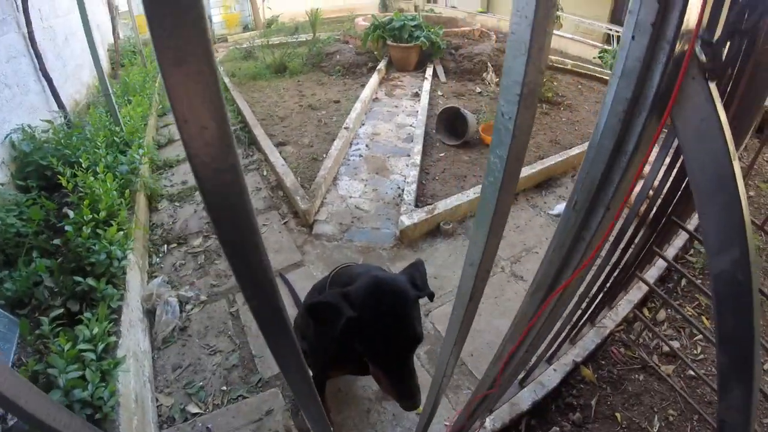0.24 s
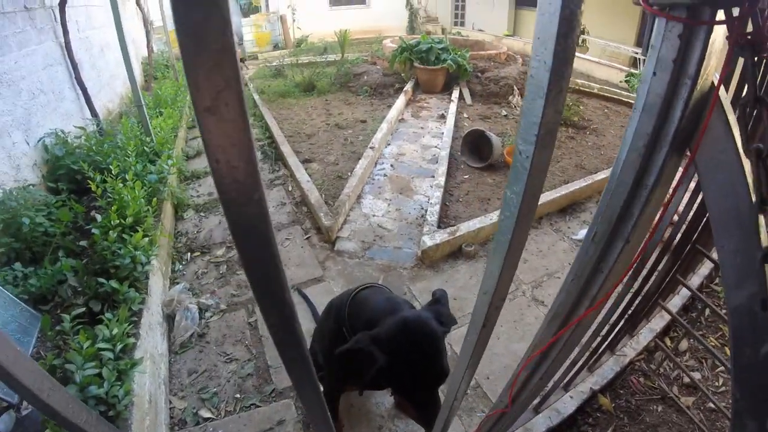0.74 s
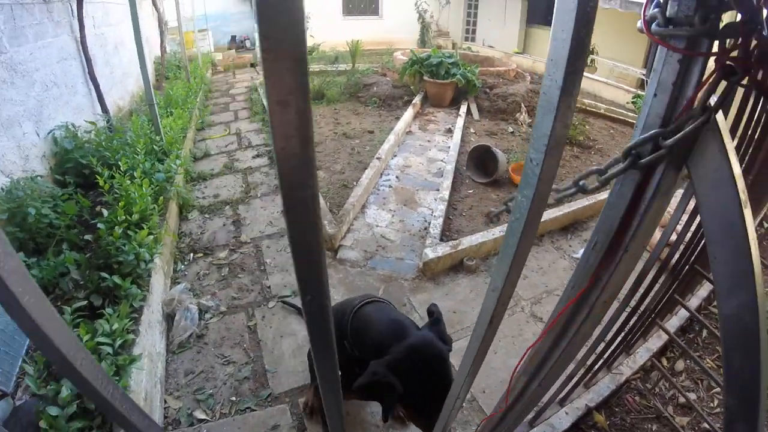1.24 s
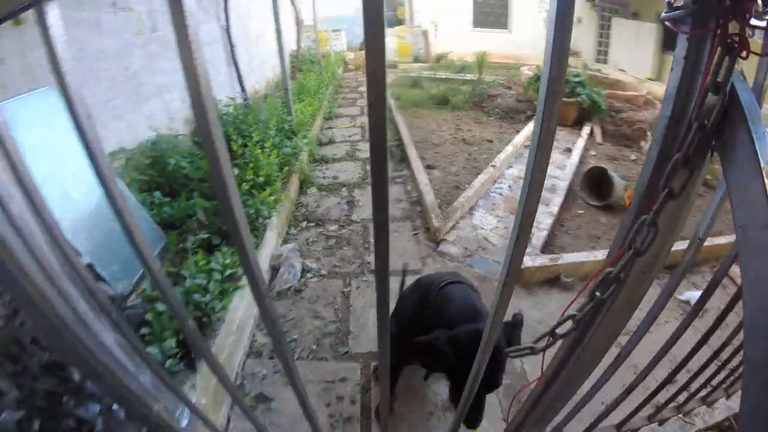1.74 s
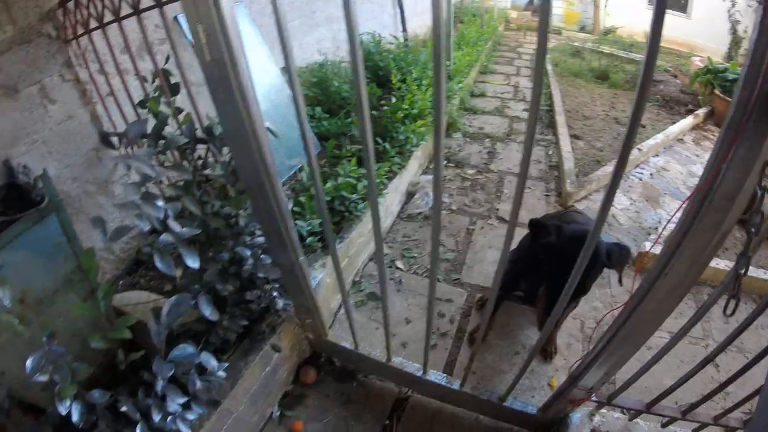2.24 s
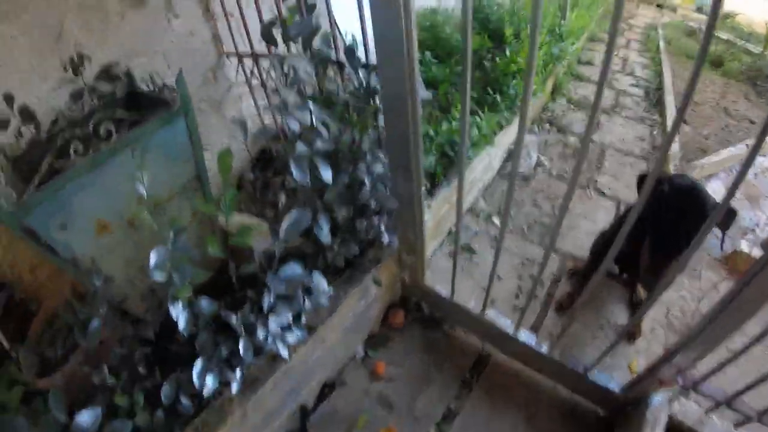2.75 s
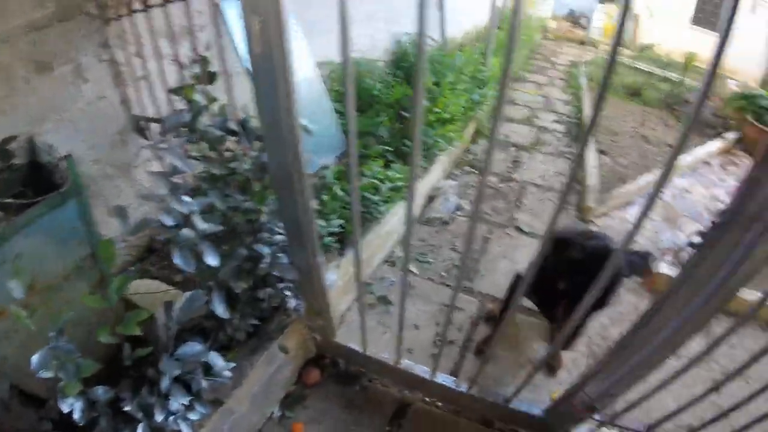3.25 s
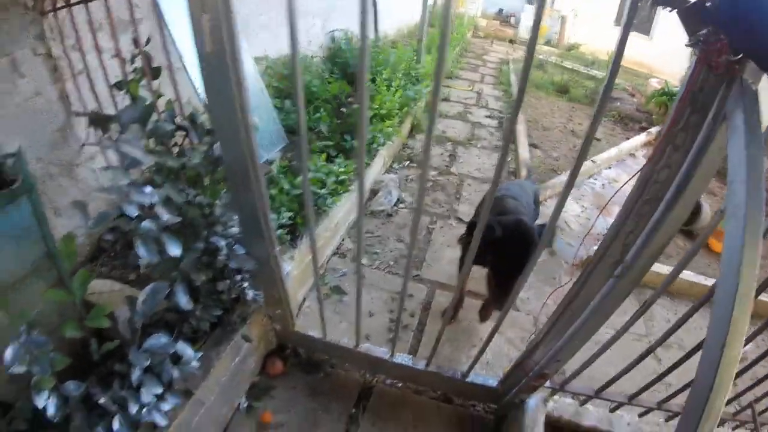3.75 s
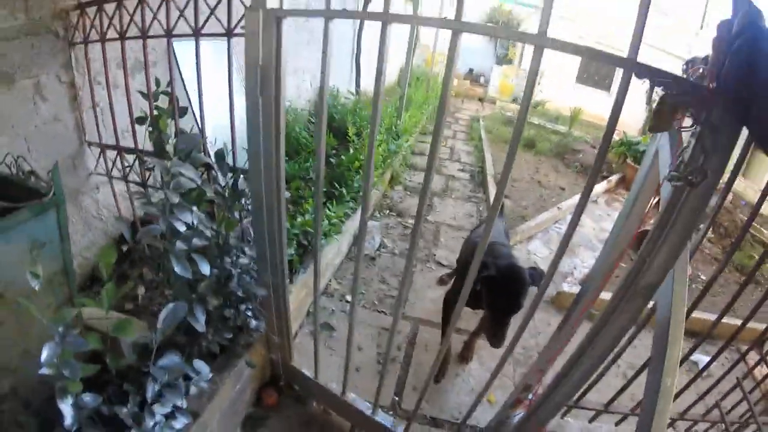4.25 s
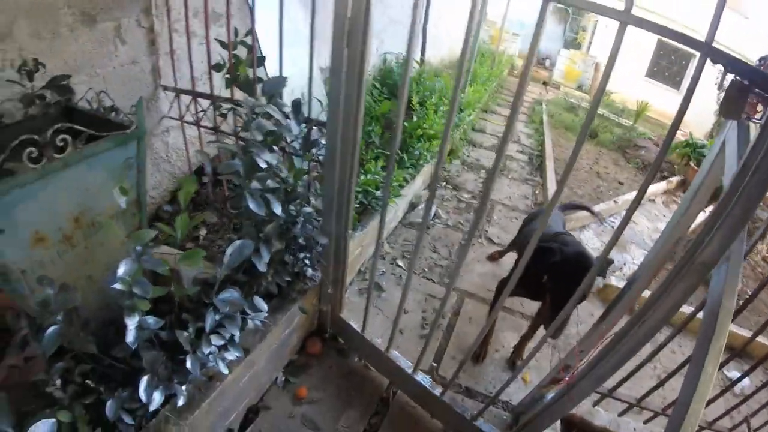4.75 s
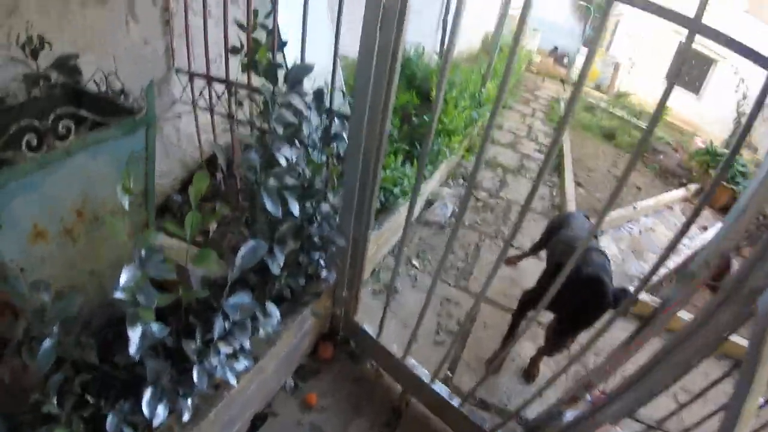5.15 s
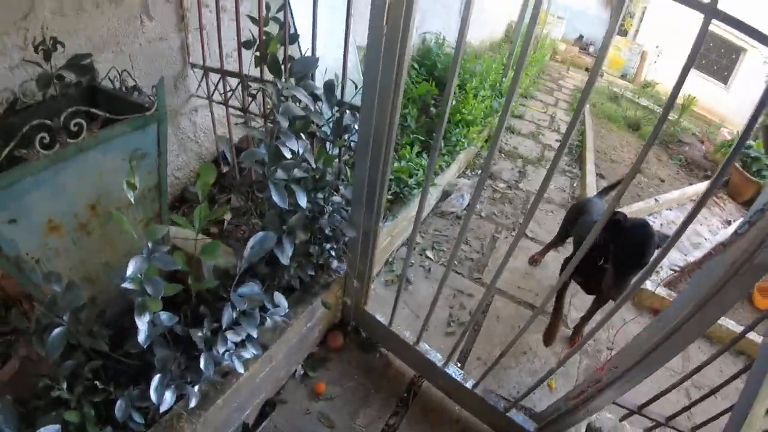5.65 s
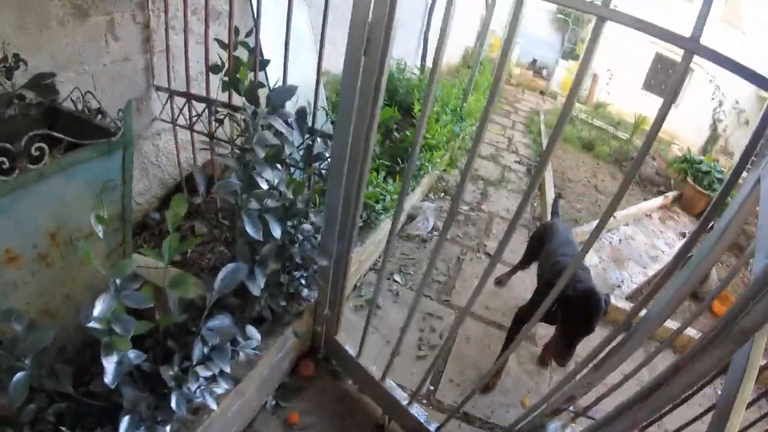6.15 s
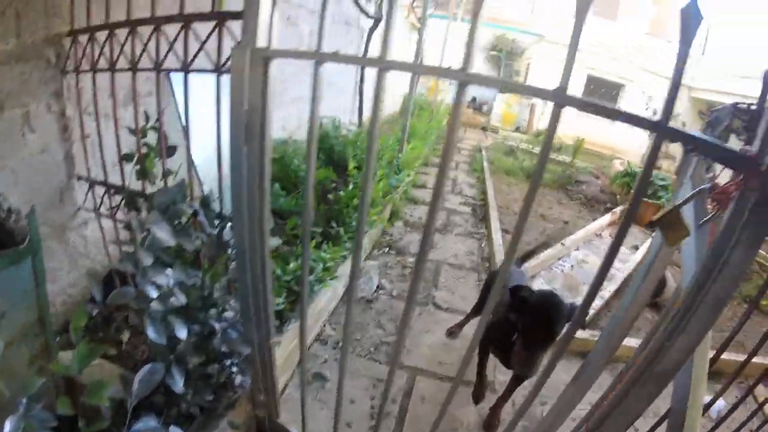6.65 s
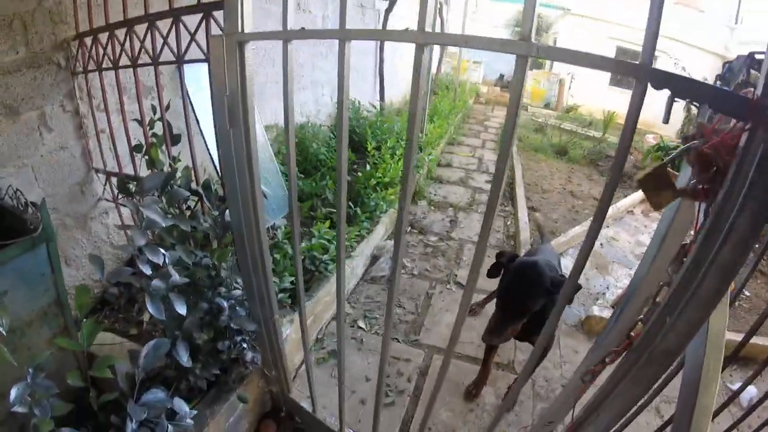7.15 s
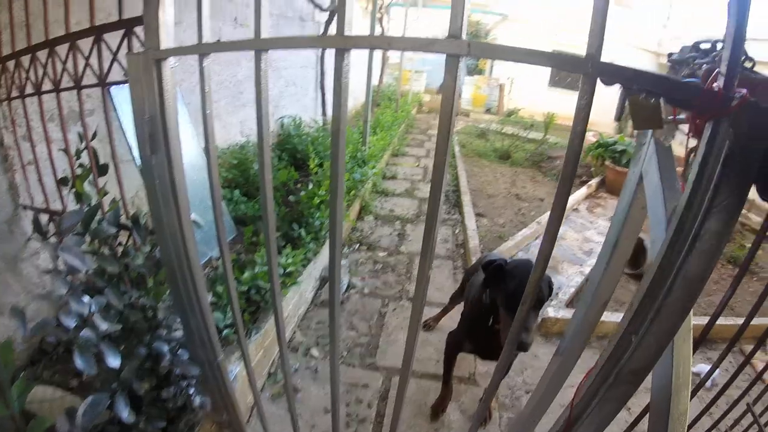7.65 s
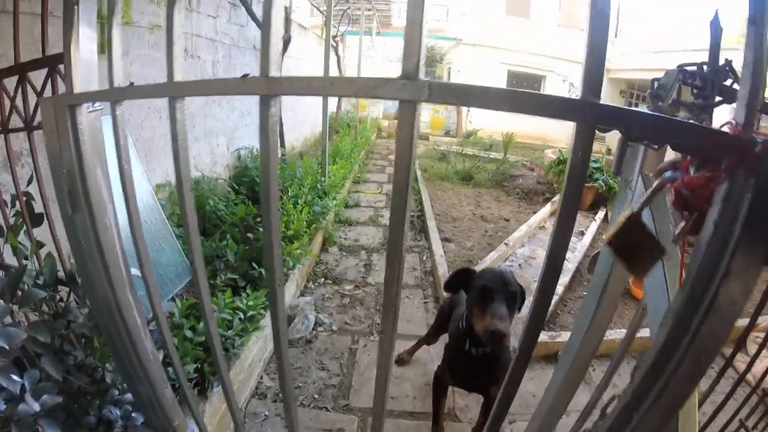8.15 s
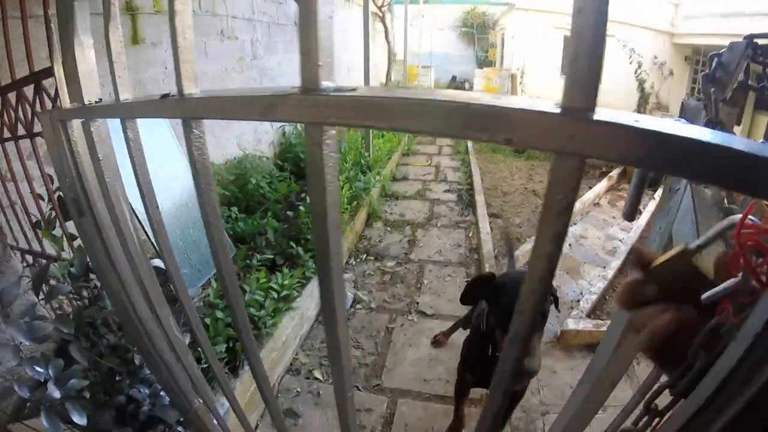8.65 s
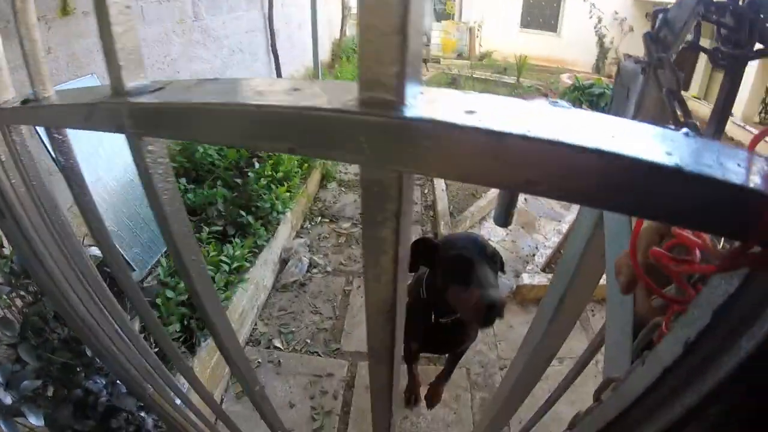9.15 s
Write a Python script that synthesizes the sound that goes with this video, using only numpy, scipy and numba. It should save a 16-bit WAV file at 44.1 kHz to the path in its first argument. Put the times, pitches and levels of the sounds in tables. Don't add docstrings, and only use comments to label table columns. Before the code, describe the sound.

Thin, boxed-in outdoor sound with little bass from outside: irregular metallic knocks on a barred gate, one loud clank early, then sparse taps, a plasticky thump at the microphone and paw scuffs. A dense burst of chain clatter follows with low humming, then bolt knocks, bright tinkling links, a ringing double blow and scattered light lock clicks over constant hiss and deep handling rumble.

```python
import sys
import numpy as np
from scipy import signal
from scipy.fft import rfft, irfft, next_fast_len
from scipy.io import wavfile
from numba import njit

SR = 44100
rng = np.random.default_rng(int(sys.argv[2]) if len(sys.argv) > 2 else 0)


def linear_from_db(decibels):
    return 10 ** (np.asarray(decibels, float) / 20)


def to_wav(sig):
    pcm = np.clip(np.atleast_2d(sig), -1, 1) * 32767
    pcm = np.round(pcm).astype(np.int16)
    wavfile.write(sys.argv[1], SR, pcm.T)


N = 414523
T = np.arange(N) / SR
PORT_HZ, TOP_HZ = 1250, 15200


def unit(x):
    return x / np.sqrt(np.mean(x ** 2))


def shape(table, hz):
    f, v = np.transpose(table)
    return np.interp(np.log(hz), np.log(f), v)


def coloured(x, table):
    size = next_fast_len(N)
    hz = np.maximum(np.arange(size // 2 + 1) * SR / size, 1)
    spectrum = rfft(x, size) * linear_from_db(shape(table, hz))
    return unit(irfft(spectrum, size)[:N])


def band(lo_hz, hi_hz):
    sos = signal.butter(2, [lo_hz, hi_hz], "band", fs=SR, output="sos")
    return unit(signal.sosfilt(sos, rng.standard_normal(N)))


def conv(x, response):
    return signal.oaconvolve(x, response)[:N]


def bursts(rows, attack_s, release_s, extra_db=0.):
    fade_db = 30
    total = np.zeros(N)
    for (s, hold, db), extra in zip(np.array(rows)[:, :3], extra_db + np.zeros(len(rows))):
        edges = np.cumsum([s - attack_s, attack_s, hold, release_s])
        span = slice(max(int(edges[0] * SR), 0), int(edges[-1] * SR))
        fade = np.interp(T[span], edges, [-fade_db, 0, 0, -fade_db])
        total[span] += linear_from_db(db + extra + fade)
    return total


def clicks(rate, scatter_db):
    happens, sign, strength = rng.random((3, N))
    level = linear_from_db(-scatter_db * np.log(strength + 0.025))
    return unit((happens < rate / SR) * np.sign(sign - .5) * level)


def blows(times, dbs, contact_ms, first=0.):
    out, t = np.zeros(N + 2048), np.arange(2048) / SR
    for s, db, ms, chatter in zip(times, dbs, contact_ms, rng.standard_normal((len(times), 2048))):
        u = 1000 * t / np.clip(ms, .1, 12)
        burst = chatter * np.sqrt(u + 0.0068) * np.exp(-u)
        burst = burst / np.sqrt(np.sum(burst ** 2)) + first * (t == 0)
        start = int(s * SR)
        out[start:start + 2048] += linear_from_db(db) * burst
    return out[:N]


@njit
def decay(hz, gain, t60, phase, size):
    out = np.zeros(size)
    for k in range(len(hz)):
        z = gain[k] * np.exp(1j * phase[k])
        p = np.exp((2j * np.pi * hz[k] - np.log(1000) / t60[k]) / SR)
        for i in range(min(size, int(1.2 * t60[k] * SR))):
            out[i] += z.imag
            z *= p
    return out


def ring(modes, seconds, scatter=0.):
    hz, db, t60 = np.transpose(modes) * 1.
    phase = scatter * 2 * np.pi * rng.random(len(hz))
    return decay(hz, linear_from_db(db), np.clip(t60, .005, 2.5), phase, int(seconds * SR))


def twins(modes, spread):
    hz, db, t60 = np.transpose(modes)
    off = 1 + spread * rng.standard_normal((2, len(hz)))
    return np.vstack([modes] + [np.transpose([hz * o, db - 6, .7 * t60]) for o in off])


def hiss():
    # pitch_hz, level_db (per Hz)
    hiss_curve = [(88, -7), (150, -3.5), (234, -2), (268, -2.5), (812, -7.5), (1290, -10), (1540, -8.5),
                  (1660, -11), (3980, -17), (13500, -32.5), (15200, -41)]
    return linear_from_db(-59) * coloured(rng.standard_normal(N), [(60, -44.0)] + hiss_curve)


def handling():
    # start_s, hold_s, level_db
    shifts = [
        (.1, 0.58, -62),
        (2.65, 0.85, -48),
        (4.13, 0.029, -33.5),
        (5.0, 0.37, -47),
        (6.0, 0.062, -39.5),
        (6.45, 0.31, -53),
        (7.25, 0.22, -77),
        (8.9, 0.027, -44),
    ]
    deep = (linear_from_db(-54) + bursts(shifts, attack_s=0.083, release_s=0.47)) * band(1.8, 15.8)
    return deep + linear_from_db(-59.5) * band(17.0, 59.0) + linear_from_db(-65.5) * band(55, 176)


def parts():
    # pitch_hz, level_db, t60_s (time to fall 60 dB)
    latch = [(1432, -8, .35), (1545, -14, .7), (2481, -15, 1.2), (2505, -15, 1.1), (2627, -19, .7),
             (2745, -8, .38), (2842, -9, .45), (2955, -7, .42), (3300, -8, .15), (3499, -19, .5),
             (3725, -10, .23), (4576, -8, .1), (5943, -6, .13), (6115, -13, .2)]
    rail = [(1615, -11, 0.45), (1570, -15, .4), (2885, -3, 0.4), (3192, -17, 0.43), (3542, 0, 0.18),
            (4145, -7, 0.14), (4700, -14, 0.15), (5884, -8, 0.21), (6438, -22, 0.3), (7090, -18, 0.23)]
    post = [(1610, -8, .27), (2584, -11, .32), (2789, -12, .28), (3332, -14, .45), (3505, -4, .66),
            (3530, -7, .6), (3591, 0, .36), (3924, -17, .4), (4436, -15, .24), (4721, -17, .33),
            (5916, -19, .33), (6465, -14, .25), (7106, -17, .55), (8441, -17, .35)]
    held_post = [(3321, -14, .4), (3494, -6, .28), (3591, 0, .26), (3693, -7, .3)]
    bolt = [(2509, -13, .6), (2778, -10, .41), (3289, -17, .55), (3801, -3, .2), (4474, -11, .22),
            (4942, -11, .28), (5033, -3, .25), (5319, -14, .22), (6471, -9, .24), (6982, -6, .12),
            (8436, -8, .12)]
    bar = [(2487, -11, .85), (2562, -4, .43), (2745, -8, .5), (2950, -9, .31), (3801, -4, .2),
           (4016, -6, .21), (4360, -6, .17), (4953, -11, .26), (5039, -9, .32), (5862, -2, .19),
           (6142, -11, .22), (1432, -14, .6)]
    lock = [(1437, -4, .08), (3558, -9, .34), (3630, -10, .28), (3709, 0, .24), (3838, -7, .14),
            (4086, -21, .27), (6158, -13, .12), (6778, -16, .13), (7084, -24, .5), (7634, -18, .14)]
    loop = [(2186, -9, .3), (2482, -13, .5), (2864, -10, .4), (3332, -6, .3), (3488, -10, .3),
            (5319, -13, .1), (6401, -13, .11), (7084, -7, .25), (8565, -10, .1)]
    hasp = [(1432, 0, .14), (1599, -16, .3), (2169, -12, .45), (2363, -14, .24), (2789, -16, .31),
            (2875, -11, .26), (2918, -11, .38), (3246, -18, .3), (2600, -16, .25), (3537, -12, .3),
            (3623, -16, .35)]
    brace = [(1610, -16, .35), (3505, -2, .7), (3591, 0, .5), (3660, -8, .3), (7106, -16, .3)]
    shackle = [(1448, -4, .19), (2191, -16, .5), (2568, -12, .45), (3370, 1, .14), (3537, -16, .4),
               (3704, -16, .3), (5922, -14, .15), (7079, -3, .08)]
    hook = [(2169, -17, .7), (2363, -8, .29), (2568, -17, .6), (2869, -2, .14), (3332, -3, .29),
            (3472, -8, .55), (3908, -6, .2), (7084, -22, .5)]
    keeper = [(2169, -14, .7), (2401, -4, .42), (2632, -6, .32), (2799, -7, .35), (3537, -3, .65),
              (5211, -5, .17), (6444, -8, .23), (6638, -1, .12), (7041, -15, .3)]
    staple = [(3408, 0, .24), (3800, -6, .2), (4667, -3, .5), (5340, -10, .3), (6578, -6, .28),
              (6918, -5, .26)]
    # start_s, peak_db, low_shimmer_db, ring_db, contact_ms
    latch_hits = [
        (0.1973, -61.5, -11, 13.5, 3.9),
        (0.3087, -31, 2, -11, 8.1),
        (0.3270, -32, -12, -13, 0.79),
        (0.3599, -30.5, -5, -3, 1.4),
        (0.3978, -27, -24, -3, 31),
        (0.4982, -37.5, -4, -13, 5.3),
        (0.5647, -22, -5, -6.5, 0.87),
        (0.6175, -23, -25, -34, 8),
        (0.6778, -27, 0, 7, 8.1),
        (1.038, -47, 2.5, -11, 0.9),
    ]
    rail_hits = [
        (1.1622, -25, -9, -3, 1.1),
        (1.3150, -40, -3.5, -15, 1.4),
        (3.122, -55, 1, -25, 4.5),
        (3.3302, -29, -5, -11, 5.1),
        (3.349, -38.5, 1, -24, 2.3),
    ]
    post_hits = [
        (1.486, -52, 4, 11.5, 3.6),
        (1.5262, -28, -23, -33, 3.5),
        (1.5455, -29, -8, -10, 0.91),
        (1.5535, -17.5, -30, -38, 0.86),
        (1.5604, -13, -17.5, -18.5, 1.46),
        (1.5715, -15.5, -27.5, -34, 1.4),
        (1.5830, -28, -6, -9, 1.5),
        (1.5935, -31.5, -7, 4.5, 2),
        (1.616, -56, 20, -14, 1.1),
    ]
    held_post_hits = [
        (4.0322, -30, -2, 3, 7.8),
        (4.0542, -16.5, -16, -6, 0.84),
        (4.0615, -16, -13, -8, 0.89),
        (4.0694, -20, -24, -1, 1.9),
        (4.1574, -27.5, 7, -23, 0.71),
        (4.2283, -24, -4, -19, 5.9),
        (4.2612, -20.5, -4, 4.5, 5.1),
        (4.2894, -34.5, 6, 14.5, 2),
        (4.4094, -39, -6, -19, 3.2),
        (4.4997, -46, 7, -7, 5),
    ]
    bolt_hits = [
        (4.6475, -27.5, -32, -25, 4.8),
        (4.7481, -23.5, -4.5, -31, 4.9),
        (4.7896, -31.5, -8, -27, 1.7),
        (4.958, -34, 1, -27, 15),
        (4.9908, -22.5, -4.5, -1.5, 3),
        (5.0289, -30.5, -32, -27, 3.7),
        (5.3483, -42, 2.5, -25, 9.2),
    ]
    bar_hits = [
        (6.3440, -19.5, -5, -1, 1.9),
        (6.3490, -17, -11, -4, 3.8),
    ]
    lock_hits = [
        (6.116, -31, -1, -7, 3.4),
        (8.1575, -29.5, -7, 6.5, 3.6),
    ]
    loop_hits = [
        (6.4770, -25, -12, 0.5, 2),
        (6.5600, -27.5, -9, 1, 2.2),
    ]
    hasp_hits = [
        (8.3520, -44, 0, 12.5, 1.9),
        (8.8962, -56, 1, -7, 1.5),
    ]
    brace_hits = [
        (2.5276, -36, -8, -26, 4.1),
        (2.5371, -30.5, -9, -23, 2.6),
        (2.5556, -24.5, -8.5, -2.5, 1.2),
        (2.5694, -51, -26, 3, 3.1),
        (2.6394, -31.5, -7.5, -11, 4.3),
    ]
    shackle_hits = [
        (7.9998, -37, -20, 1.1, 1.1),
    ]
    hook_hits = [
        (6.7382, -32, -1.9, -3.5, 2.3),
    ]
    keeper_hits = [
        (7.1791, -50.5, 4.5, -5, 2.5),
        (7.191, -37.5, -13, -10, 2.9),
        (7.2932, -33, -1, -9, 2.9),
    ]
    staple_hits = [
        (4.571, -36.5, -1, -24, 3.9),
        (5.2974, -51, 5.5, -15, 12),
        (5.4768, -41, 0, -19, 5.2),
        (5.68, -39.5, -0.5, -4, 9.5),
        (5.7264, -37.5, 1.5, -13, 4.2),
    ]
    return [(latch_hits, latch, -1.5, 0.5), (rail_hits, rail, -1, -1),
            (post_hits, post, -7, -1.5), (held_post_hits, held_post, -8, 0),
            (bolt_hits, bolt, -2.5, -2.5), (bar_hits, bar, -2.5, -1.2),
            (lock_hits, lock, -9, -1.5), (loop_hits, loop, -3, -2.5),
            (hasp_hits, hasp, -1.5, -6), (brace_hits, brace, -6, -4.5),
            (shackle_hits, shackle, -8, -1.5), (hook_hits, hook, -2.5, -4),
            (keeper_hits, keeper, -3, -2.5), (staple_hits, staple, -3, -2.5)]


def shimmer():
    # pitch_hz, level_db (per Hz)
    frame_curve = [(1200, -18), (1300, -6), (1540, 7.5), (1800, -8.5), (2150, -21.5), (2550, -9),
                   (2800, -5.5), (3100, -13), (3580, -6.5), (4100, -13), (4700, -16), (5430, -18),
                   (6500, -12), (8600, -16.5), (12100, -31), (14000, -51), (15500, -49.5)]
    # pitch_hz, t60_s
    frame_t60 = [(1000, 0.37), (3000, 0.23), (7000, 0.2), (14000, 0.098)]
    hz = np.sort(rng.uniform(900, 15500, 2500))
    level_chance, time_chance = rng.standard_normal((2, 2500))
    t60 = shape(frame_t60, hz) * linear_from_db(2.2 * time_chance)
    modes = np.transpose([hz, shape(frame_curve, hz) + 2 * level_chance, t60])
    seconds = .4
    crack = 1 + 1.1 * np.exp(-np.arange(int(seconds * SR)) / SR / .005)
    registers = []
    for lo, hi in [(0, 2000), (2000, 3150), (3150, 5000), (5000, SR)]:
        part = crack * ring(modes[(hz >= lo) & (hz < hi)], seconds, scatter=1)
        registers.append(part / np.sqrt(np.mean(part[:400] ** 2)))
    return registers


def strike_parts():
    push, rings = np.zeros((3, 4, N)), 0
    swell = 1 - np.exp(-np.arange(int(1.2 * SR)) / SR / 0.0054)
    for k, (hits, modes, body_db, high_db) in enumerate(parts()):
        s, db, low_db, ring_db, ms = np.transpose(hits)
        push[k % 3] += [blows(s, db + extra_db, ms, first=0.19) for extra_db in (low_db, body_db, 0, high_db)]
        taps = blows(s, db + ring_db - 15, .5 * ms, first=2.5)
        response = swell * ring(twins(modes, spread=0.00657), 1.2, scatter=0.82)
        rings = rings + conv(taps, response)
    return push, rings


def clinks():
    # start_s, level_db, pitch_hz, t60_s
    strikes = [(.21, -51, 3340, .2), (.2572, -45, 2810, .15), (.3131, -38, 3360, .1),
               (.3265, -29, 3280, 0.063), (.3265, -29, 4380, .05), (.3679, -47, 2900, .13),
               (.3964, -33, 3210, .1), (0.4056, -39, 3000, 0.79), (.565, -27.5, 3300, 0.23),
               (.6174, -35, 3290, 0.16), (0.6167, -30, 4520, .12), (.6174, -27.5, 8500, .1),
               (0.6768, -40, 2492, 1.1), (0.678, -32, 6030, 0.13), (1.1625, -24.5, 3440, 0.1),
               (1.3152, -43, 3420, .12), (1.572, -17, 7040, 0.12), (1.575, -43, 2840, 0.18),
               (1.165, -36, 1610, 0.43), (1.165, -53, 2050, 0.23), (2.036, -54, 2900, .05),
               (2.556, -41.5, 1603, 0.55), (2.878, -53, 1900, .05), (3.335, -49, 1620, 0.83),
               (4.0602, -18, 3740, 0.12), (4.062, -24, 7100, 0.11), (4.2019, -36, 5940, .1),
               (4.228, -25.5, 3330, .2), (4.2613, -33, 3590, 0.19), (4.262, -21, 3940, 0.13),
               (4.265, -29, 2770, 0.24), (4.285, -38, 4620, .12), (4.422, -39.5, 6550, 0.1),
               (4.992, -46, 3300, 0.29), (4.992, -37, 2170, 0.13), (4.994, -37, 5033, .35),
               (5.295, -54, 3290, 0.53), (5.477, -52, 4660, .12), (5.477, -44.5, 1486, 0.17),
               (8.897, -52, 1420, 0.13), (8.898, -54, 3320, .1), (8.897, -56, 3850, .08)]
    spread = 0.0133
    out = np.zeros(N + SR)
    for (s, db, hz, t60), off in zip(strikes, rng.standard_normal((len(strikes), 2))):
        neighbours = [(hz * (1 + spread * o), db - 9, .7 * t60) for o in off]
        note = ring([(hz, db - 4, t60)] + neighbours, .9)
        note = note * (1 - np.exp(-np.arange(len(note)) / SR / 0.00055))
        start = int(s * SR)
        out[start:start + len(note)] += note
    return out[:N]


def snap_links():
    # start_s, peak_db
    first_snaps = [(0.224, -48), (.258, -39.5), (0.3088, -34), (0.326, -34), (0.357, -28.5), (.3685, -34),
                   (0.3978, -48), (.499, -32), (0.911, -58), (1.002, -61), (1.461, -54)]
    haul_snaps = [(4.046, -21), (4.166, -22.5), (4.2017, -29), (4.2593, -35), (4.299, -48), (4.4064, -49),
                  (4.425, -44), (4.509, -61), (4.57, -36), (4.6282, -36), (4.645, -31.5)]
    slide_snaps = [
        (5.926, -57),
        (5.9443, -55),
        (5.967, -42),
        (5.9958, -30.5),
        (6.021, -35),
        (6.048, -30),
        (6.1158, -39),
        (6.2352, -52),
        (6.337, -56),
    ]
    s, db = np.transpose(first_snaps + haul_snaps + slide_snaps)
    contact_ms = s * 0 + 0.19
    return [blows(s, db + extra_db, contact_ms, first=0.39) for extra_db in (-8.5, -3.5, -1)]


def drag_chain():
    # start_s, hold_s, level_db, low_shimmer_db
    drags = [(0.257, 0.052, -41, -0.5), (0.326, 0.14, -57, 4), (4.069, 0.038, -34, 2.5),
             (4.145, 0.072, -31.5, 2.5), (4.226, 0.054, -30, -21), (4.333, 0.041, -50, 6),
             (4.412, 0.082, -46, 6.5), (4.583, 0.0073, -35, -3), (4.634, 0.01, -38, 5.5),
             (4.685, 0.014, -83, -6), (5.95, 0.1, -40, 3)]
    grit = clicks(rate=900.0, scatter_db=5.0)
    register_dbs = (np.array(drags)[:, -1], -1.5, 0, -3.5)
    return [grit * bursts(drags, attack_s=0.042, release_s=0.086, extra_db=db) for db in register_dbs]


def links(rattle):
    # pitch_hz, level_db, t60_s
    link_modes = [(13480, -10, .22), (13620, -5, .25), (13760, 0, .3), (13880, -4, .22), (13990, -2, .3),
                  (14900, -13, .15), (15050, -14, .15)]
    # start_s, peak_db
    touches = [(0.273, -26), (0.345, -22), (0.389, -21), (0.439, -41), (0.605, -21), (0.8306, -37),
               (1.005, -25), (1.5888, -17), (2.5421, -27), (3.3358, -36), (4.1639, -17), (4.1915, -34),
               (4.3005, -22), (4.6269, -29), (4.6433, -26), (4.783, -24), (4.8259, -29), (4.9192, -29),
               (4.998, -16), (5.032, -42), (5.364, -27), (5.401, -39), (5.7259, -32), (5.9668, -14),
               (5.998, -19), (6.0414, -15), (6.1227, -45), (6.2153, -58), (6.3859, -35), (6.594, -46),
               (5.258, -44), (7.205, -46)]
    # time_s, level_db
    jingle = [
        (5.96, -71),
        (6.0, -34),
        (6.1, -44),
        (6.3, -52),
        (6.36, -43),
        (6.66, -62),
        (6.76, -80),
    ]
    s, db = np.transpose(touches)
    tick = np.diff(blows(s, db - 8, s * 0 + 1.5), prepend=0)
    jingle_s, jingle_db = np.transpose(jingle)
    jingle_gain = linear_from_db(np.interp(T, jingle_s, jingle_db, left=-150, right=-150))
    contact = rng.standard_normal(128) * np.hanning(128) / 7
    tremble = linear_from_db(-35) * jingle_gain * conv(clicks(rate=500.0, scatter_db=3.), contact)
    response = ring(twins(twins(link_modes, spread=.006), spread=.004), .55, scatter=1)
    response = linear_from_db(-3.5) * response * np.exp(-np.arange(len(response)) / SR / .12)
    return conv(blows(s, db - 24, s * 0 + 4) + rattle + tremble, response) + tick


def gate():
    push, rings = strike_parts()
    push[2, 1:] += snap_links()
    drag = drag_chain()
    push[1] += linear_from_db(-27.0) * np.array(drag)
    frame = 0
    for region in push:
        frame = frame + sum(conv(p, r) for p, r in zip(region, shimmer()))
    jolt = linear_from_db(-36.5) * push[:, 2].sum(axis=0)
    return linear_from_db(-9.0) * frame + rings + links(linear_from_db(-58.0) * drag[2] + jolt)


def tube():
    # pitch_hz, level_db, t60_s
    tube_modes = [(1505.6, 0, 1.25), (1492, -5.5, 2.6)]
    # start_s, level_db
    tube_hits = [
        (.679, -50),
        (4.75, -56),
        (4.992, -41),
        (6.347, -32.5),
        (6.563, -52),
        (7.295, -66),
    ]
    s, db = np.transpose(tube_hits)
    return conv(blows(s, db - 20, s * 0 + 3, first=10), ring(tube_modes, 2.4))


def bumps():
    # start_s, level_db, pitch_hz (negative when pushed inwards), t60_s
    knocks = [(2.8765, -27, 150, .025), (2.877, -37, 330, .025), (5.05, -42, 60, .12), (3.66, -44, 70, .15),
              (2.86, -36, 40, .1), (3.4595, -24, 250, .045), (3.458, -36, 600, .03),
              (3.4553, -23, -120, .04), (3.456, -28, 1600, .03), (3.4695, -16, 1800, .018),
              (3.4695, -14, 3000, .008), (3.4697, -18, 4800, .003), (3.4697, -21, 8000, .003),
              (3.472, -30, -90, .05), (3.485, -31, -35, .1)]
    out = np.zeros(N)
    no_bass = signal.butter(3, .8 * PORT_HZ, "high", fs=SR, output="sos")
    for s, db, hz, t60 in knocks:
        knock = ring([(hz, db, t60)], .2)
        if hz > PORT_HZ:
            knock = signal.sosfilt(no_bass, knock)
        start = int(s * SR)
        out[start:start + len(knock)] += knock
    return out


def paws():
    # start_s, hold_s, level_db
    scuffs = [
        (3.468, 0.0019, -18),
        (3.495, 0.11, -42.5),
        (3.575, 0.016, -35.5),
        (3.62, 0.12, -44.5),
        (3.705, 0.089, -49),
        (3.808, 0.026, -44.5),
    ]
    # pitch_hz, level_db (per Hz)
    slab_curve = [(530, -42), (900, 25), (1130, -5), (1620, 6.5), (2260, -3), (2710, 5), (4490, -13.5),
                  (6050, -11), (6490, -13), (8740, -20), (14000, -33)]
    # pitch_hz, level_db, t60_s
    hollows = [(1680, -1, 0.082), (2840, 7, 0.018)]
    grit = clicks(rate=6500.0, scatter_db=6.5) + 0.5 * rng.standard_normal(N)
    stone = coloured(grit, slab_curve) + 0.14 * unit(conv(grit, ring(hollows, .05)))
    return bursts(scuffs, attack_s=0.021, release_s=0.025) * stone


def frame_hum():
    # start_s, hold_s, level_db
    swings = [
        (4.1, 0.045, -47),
        (4.62, 0.18, -60.5),
        (6.0, 0.13, -58),
    ]
    # pitch_hz, width_hz, level_db
    resonances = [(300.6, 19, 0.5), (334, 170, -2), (540, 97, -15), (784, 124, 11), (970, 310, 12)]
    hum = [linear_from_db(db) * band(hz - w / 2, hz + w / 2) for hz, w, db in resonances]
    lower, upper = unit(sum(hum[:2])), unit(sum(hum[2:]))
    return bursts(swings, attack_s=0.07, release_s=0.57) * (lower + linear_from_db(-3) * upper)


def scene():
    port = signal.ellip(4, 1, 34, [PORT_HZ, TOP_HZ], "band", fs=SR, output="sos")
    outside = signal.sosfilt(port, gate() + clinks() + tube() + paws())
    return (outside + frame_hum() + bumps() + handling() + hiss())[None]


def top_cut(x):
    return signal.sosfilt(signal.butter(12, 15700, fs=SR, output="sos"), x)


def record(dry):
    top = signal.ellip(8, .3, 60, 15350, fs=SR, output="sos")
    mix = signal.sosfilt(top, dry)
    return top_cut(mix)


dry = scene()
out = record(dry)
to_wav(out)
```